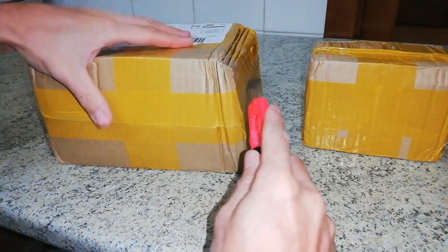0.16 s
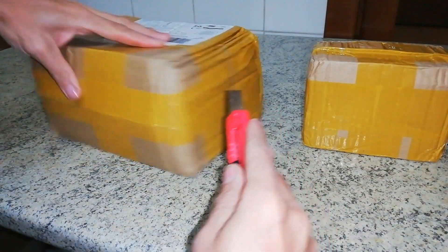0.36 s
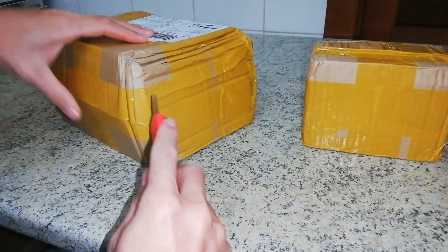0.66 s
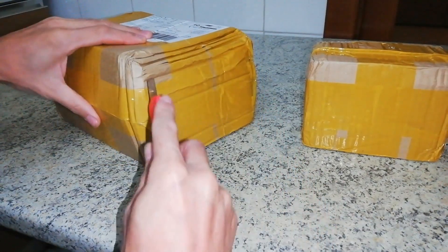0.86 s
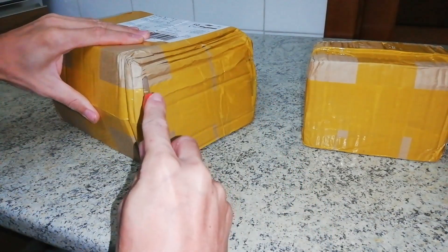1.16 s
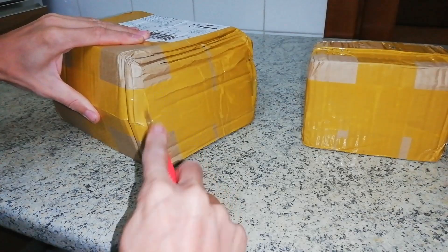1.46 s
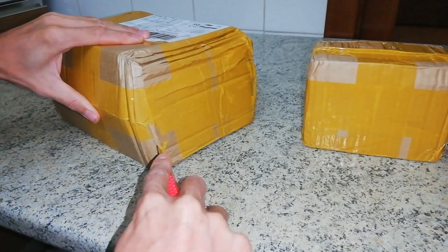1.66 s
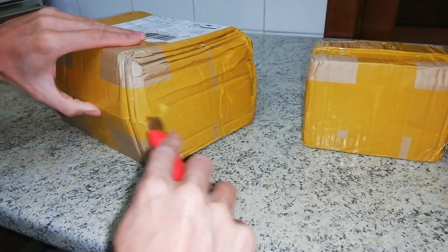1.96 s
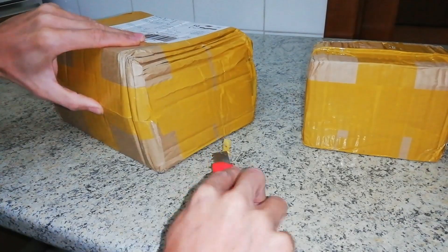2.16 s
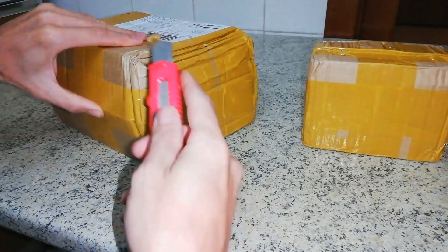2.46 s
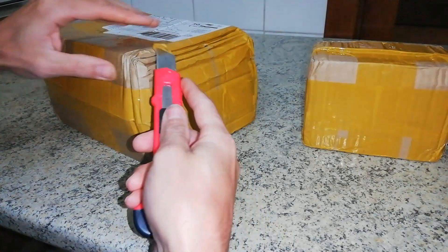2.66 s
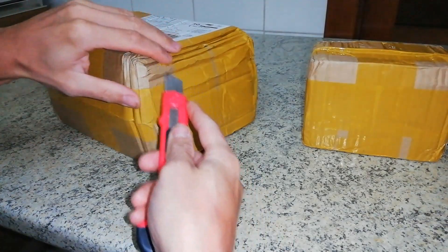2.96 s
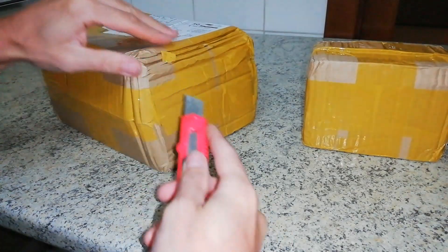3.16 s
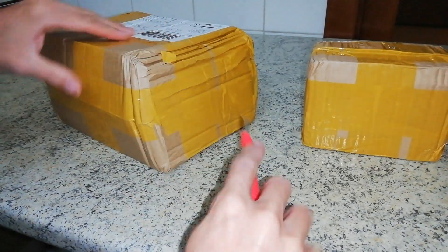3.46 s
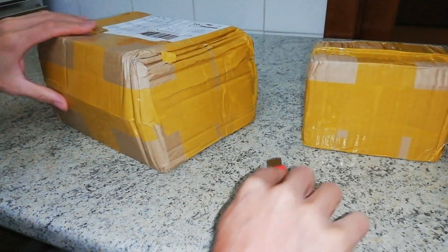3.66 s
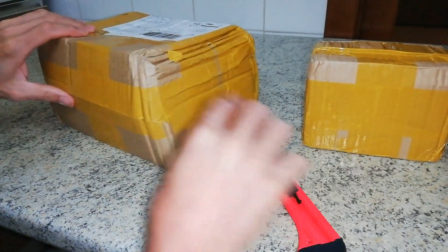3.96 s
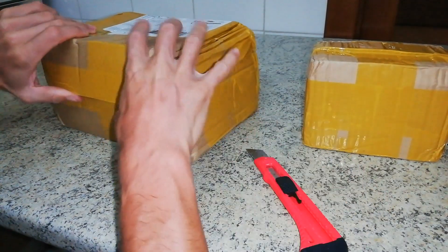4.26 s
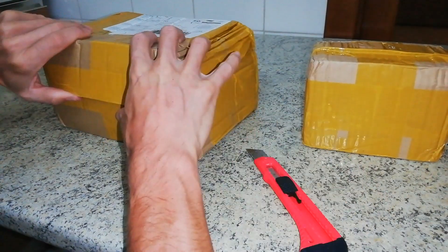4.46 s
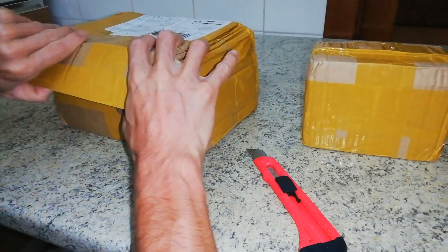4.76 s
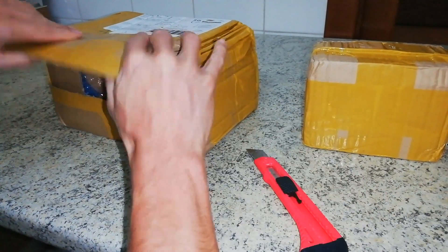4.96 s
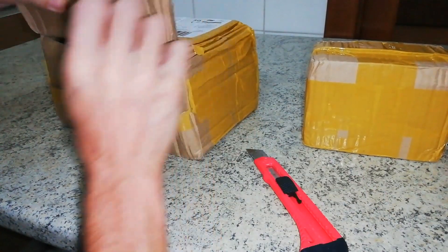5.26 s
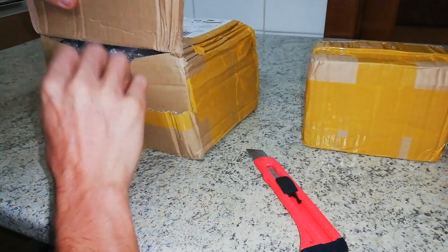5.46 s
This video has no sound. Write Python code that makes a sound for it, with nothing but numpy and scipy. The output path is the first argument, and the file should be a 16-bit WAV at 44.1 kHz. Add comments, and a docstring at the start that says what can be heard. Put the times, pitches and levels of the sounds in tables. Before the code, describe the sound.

A box cutter clacks, rasps through tape on a cardboard parcel, clatters onto a stone counter, then tape snaps and cardboard cracks open in a kitchen.

```python
"""A fridge hums in a tiled kitchen, then a cutter's blade clacks out: bursts of noise and ringing steel.
A taped cardboard box knocks, booms and hisses round on a stone counter; bright bursts snap and tick.
The blade rasps through the tape in swelling spurts of stick-slip noise, and strained tape crinkles in grains.
The cutter clatters down on the stone; then tape snaps and cardboard cracks as the flap is pulled open.
Tiles and stone answer with a diffuse ring of decaying noise."""
import sys
import numpy as np
from scipy import signal
from scipy.fft import rfft, irfft
from scipy.io import wavfile

SR = 44100
rng = np.random.default_rng(int(sys.argv[2]) if len(sys.argv) > 2 else 0)


def to_wav(sig):
    """Store sig (one row per channel, or 1-D mono) as 16-bit WAV at the path in sys.argv[1].

    Samples outside -1..1 are clipped; the rate is SR.
    """
    pcm = np.clip(np.atleast_2d(sig), -1, 1) * 32767
    pcm = np.round(pcm).astype(np.int16)
    wavfile.write(sys.argv[1], SR, pcm.T)  # frames by channels


N = 248046  # length in samples

# Table levels are drives: trims, filters and the room act on them afterwards.


def from_db(db):
    """Decibels to gain."""
    return 10 ** (np.asarray(db) / 20)


def rms_one(x):
    """Scale to unit rms."""
    return x / np.sqrt(np.mean(x ** 2) + 1e-20)


def at_hz(points, hz):
    """Read a table on a log-frequency axis."""
    points = np.array(points)
    return np.interp(np.log(np.maximum(hz, 1)), np.log(points[:, 0]), points[:, 1])


def gains(rows):
    """Each dB column of a curve as a gain in time, silent outside its span."""
    s, *columns = np.transpose(rows)
    t = np.arange(N) / SR
    return [from_db(np.interp(t, s, column, left=-np.inf, right=-np.inf)) for column in columns]


def strokes(rows):
    """Gain of rubbing strokes that gather speed, hold it and slow to a stop."""
    t = np.arange(N) / SR
    return sum(from_db(db) * np.interp(t, start + np.cumsum([0, attack, hold, release]), [0, 1, 1, 0])
               for start, attack, hold, release, db in rows)


def colour(x, spectrum, size=4096):
    """Causal (minimum-phase) filter that keeps the power of white noise."""
    shape = rms_one(from_db(at_hz(spectrum, np.linspace(0, SR / 2, size // 2 + 1))))
    # folding the cepstrum onto positive time gives the minimum phase
    cepstrum = irfft(np.log(shape))
    cepstrum[1:size // 2] *= 2
    cepstrum[size // 2 + 1:] = 0
    response = irfft(np.exp(rfft(cepstrum)))
    return signal.fftconvolve(x, response[None], axes=1)[:, :N]


def band(x, low_hz, high_hz):
    """Band-pass."""
    return signal.sosfilt(signal.butter(2, [low_hz, high_hz], "band", fs=SR, output="sos"), x)


def high_pass(x, cutoff_hz, order=2):
    """Take away the bass."""
    return signal.sosfilt(signal.butter(order, cutoff_hz, "high", fs=SR, output="sos"), x)


def ring(clicks, modes):
    """Clicks set damped resonances ringing."""
    out = 0
    for hz, db, t60 in modes:
        r = np.exp(-np.log(1000) / (t60 * SR))
        w = 2 * np.pi * hz / SR
        mode = signal.lfilter([0, np.sin(w)], [1, -2 * r * np.cos(w), r * r], clicks + 1e-18)
        out = out + from_db(db) * mode
    # a small body radiates little below its lowest mode, which is listed first
    return high_pass(out, modes[0][0] * 2 / 3)


def clicks_at(times, levels_db):
    """One impulse for each blow."""
    out = np.zeros(N)
    out[(np.asarray(times) * SR).astype(int)] = from_db(levels_db)
    return out


def stereo_noise(alike):
    """White noise partly shared by the two microphones; alike is the shared part of the power, 0-1."""
    return np.sqrt(alike) * rng.standard_normal(N) + np.sqrt(1 - alike) * rng.standard_normal((2, N))


def pan_gains(db, pan):
    """Left and right gain around a level; pan is left minus right in dB."""
    return from_db([[db + pan / 2], [db - pan / 2]])


def bursts(times, levels_db, pans_db, t60, rise_s):
    """Stereo envelope of fractures that build up within a moment and die quickly."""
    power, t = np.zeros((2, N)), np.arange(SR // 10) / SR
    shape = np.minimum(t / rise_s, 1) * np.exp(-np.log(1000) * np.maximum(t - rise_s, 0) / t60)
    for s, db, pan in zip(times, levels_db, pans_db):
        i = int(s * SR)
        power[:, i:i + len(t)] += (pan_gains(db, pan) * shape[:N - i]) ** 2
    return np.sqrt(power)


def grains(per_s, spread_db, grain_s, alike):
    """Fibres catching and letting go: tiny bursts of uneven size at random moments; rms 1."""
    sizes = from_db(spread_db * np.minimum(rng.exponential(1, N), 3))
    born = rng.random(N) < per_s / SR
    power = signal.lfilter([1], [1, -np.exp(-2 / (grain_s * SR))], born * sizes ** 2 + 1e-18)
    return rms_one(np.sqrt(power) * stereo_noise(alike))


def slips(per_s, uneven, spread_db, slip_s, rub):
    """Stick and slip: a ragged train of short tears over a little steady rubbing; rms 1."""
    gaps = np.exp(uneven * rng.standard_normal(N // 40)) / per_s  # the median gap is 1 / per_s
    times = np.cumsum(gaps)
    times = times[times < N / SR]
    tears = clicks_at(times, spread_db * rng.random(len(times)))
    power = signal.lfilter([1], [1, -np.exp(-2 / (slip_s * SR))], tears ** 2 + 1e-18)
    return rms_one(np.sqrt(power + rub * power.mean()) * stereo_noise(0.27))


# tint of the kitchen air: pitch_hz [Hz], level_db [dB per Hz]
AIR_COLOUR = [(20, -17.5), (50, -6), (70, -25), (100, -9), (150, -12.5), (290, -14.5), (400, -20.5),
              (600, -26.5), (1000, -25), (1500, -30), (10000, -34), (16000, -44)]
AIR_GAIN_DB = -61.5
# steady fridge lines: pitch_hz [Hz], level_db [dB rms]
FRIDGE_LINES = [(98, -65.5), (247.5, -71.5), (285, -70)]


def background():
    """Fridge lines over room noise, whose bass reaches both microphones alike."""
    t = np.arange(N) / SR
    hum = sum(from_db(db) * np.sqrt(2) * np.sin(2 * np.pi * (hz * t + rng.random())) for hz, db in FRIDGE_LINES)
    side = high_pass(rng.standard_normal(N), 500, order=1)
    air = colour(rng.standard_normal(N) + 0.99 * side * [[1], [-1]], AIR_COLOUR)
    return hum + from_db(AIR_GAIN_DB) * air


# plastic cutter clacking, in the hand and on the stone: start_s [s], level_db [dB],
# hollow handle_db [dB], ringing steel_db [dB], thin tick of the tip_db [dB], left_right_db [dB]
CLACKS = [(0.0719, -7.5, -26.5, -18, -25, 2), (0.0758, -21, -24.5, -30, -27, -12),
          (2.5126, -32.5, -47.5, -43, -54, -6), (2.5364, -25, -39.5, -35, -48, -1),
          (2.9043, -31.5, -48, -44, -55, 2), (3.4723, -16, -28, -31, -40, -8.5),
          (3.55, -27, -42.5, -35, -49, -7), (3.584, -1, -19.5, -4.5, -6, -2),
          (3.7890, -10.5, -24.5, -34, -8, -10), (3.795, -11.5, -26.5, -31, -15.5, -5)]
# handle skidding on the stone: start_s [s], attack_s [s], hold_s [s], release_s [s], level_db [dB]
HANDLE_SKIDS = [(3.544, 0.006, 0.006, 0.034, -31.5), (3.68, 0.072, 0.026, 0.0063, -39.5)]
# tints of shell, hollow handle and blade tip: pitch_hz [Hz], level_db [dB per Hz]
SHELL_COLOUR = [(700, -19), (1200, -6), (2300, -1), (2800, 0.5), (6300, 0.5), (10000, 0), (12000, -12.5),
                (16000, -25.5)]
HANDLE_COLOUR = [(380, -33.5), (800, -12), (1150, -5.5), (1550, -7), (2400, -15.5), (4000, -24)]
TIP_COLOUR = [(700, -23), (3500, -21), (7500, -15), (9700, -12.5), (16000, -35)]
# resonances of the steel: pitch_hz [Hz], level_db [dB], t60_s [s]
STEEL_MODES = [(2810, -12.5, 0.085), (6330, -9, 0.018), (9200, -23, 0.052)]


def cutter(shell_db, handle_db, ring_db, rattle_db, tick_db):
    """After each clack the loose blade and slider rattle on in the plastic handle; the steel rings briefly."""
    s, db, hollow_db, steel_db, tip_db, pan = np.transpose(CLACKS)
    clack = bursts(s, db + shell_db, pan, t60=0.02, rise_s=0.001) * stereo_noise(0.21)
    rattle = bursts(s, db + rattle_db, pan / 2, t60=0.082, rise_s=0.0022)
    rattle = rattle * slips(per_s=330, uneven=0.85, spread_db=15, slip_s=0.0011, rub=0.66)
    hollow = bursts(s, hollow_db + handle_db, pan / 2, t60=0.089, rise_s=0.0046) + strokes(HANDLE_SKIDS)
    hollow = hollow * stereo_noise(0.28)
    tick = bursts(s, tip_db + tick_db, pan, t60=0.017, rise_s=0.00061) * stereo_noise(0.49)
    steel = ring(clicks_at(s, steel_db + ring_db), STEEL_MODES)
    plastic = colour(clack + rattle, SHELL_COLOUR) + colour(hollow, HANDLE_COLOUR)
    return high_pass(plastic + colour(tick, TIP_COLOUR) + steel, 380)  # too small to radiate bass


# resonances of a knock: pitch_ratio [multiple of its pitch], level_db [dB], t60_s [s]
KNOCK_MODES = [(0.72, -3, 0.0039), (1, 1.5, 0.014), (1.299, -0.5, 0.0045)]


def knocks(times, levels_db, pitches_hz, pans_db, span):
    """Short hollow knocks, each within a factor span of the pitch of the patch that is struck or gives way."""
    out, blow = np.zeros((2, N)), signal.unit_impulse(SR // 10)
    for s, db, hz, pan in zip(times, levels_db, pitches_hz, pans_db):
        i = int(s * SR)
        tone = ring(blow, [(hz * ratio, mode_db, t60) for ratio, mode_db, t60 in KNOCK_MODES])
        tone = band(tone, hz / span, hz * span)
        out[:, i:i + len(tone)] += pan_gains(db, pan) * tone[:N - i]
    return out


# box, flap or cutter bumping down: start_s [s], box boom_db [dB], knock_db [dB], knock_hz [Hz]
BUMPS = [(0.194, -33, -38, 1290), (0.25, -33, -32.5, 288), (2.906, -55, -36, 1090), (3.4735, -74, -31, 764),
         (3.552, -64, -34.5, 440), (3.568, -65, -27, 1220), (4.8649, -31, -26, 288),
         (5.2945, -20, -32.5, 730), (5.3021, -32, -29.5, 1017)]
# a cardboard wall giving way: start_s [s] of its tape, tape_db [dB], wall_db [dB],
# thud_db [dB], thud_hz [Hz], knock_db [dB], knock_hz [Hz], left_right_db [dB]
WALL_CRACKS = [(1.34, -47, -36, -45, 400, -25, 1386, 0),
               (2.0008, -17.5, -41.5, -32, 300, -35.5, 1100, -1.5),
               (4.3214, -27, -43.5, -35, 785, -33, 1580, 13), (4.335, -20.5, -36, -32.5, 710, -27, 1200, 1),
               (4.4783, -15, -38, -20.5, 388, -23, 1180, 1), (4.681, -30, -34.5, -40, 336, -35, 810, 0),
               (4.6984, -12, -21, -15.5, 315, -21.5, 1140, 3), (4.734, -10, -21, -22, 333, -26, 1160, 6.5),
               (4.8533, -14, -22, -18.5, 272, -20, 1400, -1),
               (5.0343, -30, -38, -24.5, 725, -25.5, 1180, -2),
               (5.554, -29, -42, -32.5, 335, -34, 996, -0.5)]
# resonances of the air-filled box: pitch_hz [Hz], level_db [dB], t60_s [s]
BOX_MODES = [(130, -11, 0.033), (157.6, -2.5, 0.044), (188, -8.5, 0.16), (261, -10, 0.048)]
# the wall moves just after its tape; the boom of the box grows with it
WALL_LAG_S, BOOM_BELOW_WALL_DB = 0.00074, 8.5


def bumps(knock_db):
    """A blow or yielding wall gives a hollow knock and a boom in the air-filled box; a wall also thuds."""
    s, _, wall_db, low_db, low_hz, high_db, high_hz, pan = np.transpose(WALL_CRACKS)
    s = s + WALL_LAG_S
    thuds = knocks(s, low_db, low_hz, pan / 2, span=1.397)
    wall_knocks = knocks(s, high_db + knock_db, high_hz, pan, span=1.55)
    bump_s, box_db, bump_db, bump_hz = np.transpose(BUMPS)
    blows = knocks(bump_s, bump_db + knock_db, bump_hz, np.zeros(len(BUMPS)), span=1.49)
    pushes = clicks_at(bump_s, box_db) + clicks_at(s, wall_db - BOOM_BELOW_WALL_DB)
    boom = band(ring(pushes, BOX_MODES), low_hz=87, high_hz=267)
    return thuds + wall_knocks + blows + boom


# box swung round on the stone: start_s [s], attack_s [s], hold_s [s], release_s [s], level_db [dB]
BOX_SLIDES = [(0.23, 0.097, 0.12, 0.13, -38)]
# hand brushing over the hollow box: start_s [s], attack_s [s], hold_s [s], release_s [s], level_db [dB]
HAND_BRUSHES = [(0.965, 0.056, 0.018, 0.017, -38)]
# tints of cardboard on stone and of palm on box: pitch_hz [Hz], level_db [dB per Hz]
STONE_COLOUR = [(190, -41), (300, -8), (700, -12), (1550, -6), (2500, -10.5), (5200, -6.5), (6300, -7.5),
                (8200, -0.5), (11500, -8), (16000, -21)]
PALM_COLOUR = [(130, -36), (320, -4), (650, -2.5), (980, -7), (1800, -15), (3200, -27.5), (14000, -45)]


def sliding():
    """Cardboard hisses finely over polished stone; a hand brushes the box with a dull, hollow sound."""
    hiss = grains(per_s=2600, spread_db=0.5, grain_s=0.0002, alike=0.11)
    slide = colour(strokes(BOX_SLIDES) * hiss, STONE_COLOUR)
    brush = colour(strokes(HAND_BRUSHES) * stereo_noise(0.53), PALM_COLOUR)
    return slide + brush


# tape snaps and small ticks, a few from the cutter: start_s [s], level_db [dB], left_right_db [dB]
SNAPS_AND_TICKS = [(0.2502, -28.5, 5), (0.638, -37, 3), (1.0827, -28, -2.5), (1.3581, -44, -1),
                   (1.3873, -32, 1), (1.4189, -20, 2), (1.437, -18.5, 5), (1.4892, -23, -3),
                   (1.5538, -9, -1.5), (1.561, -16, 3), (1.566, -18.5, -6), (1.583, -28, -13),
                   (1.687, -25.5, -9), (1.7317, -25.5, -8.5), (1.808, -38, -2), (2.0702, -39.5, -16),
                   (2.104, -39.5, -6), (2.143, -41.5, -2), (2.455, -31.5, -8), (2.8191, -31, 0),
                   (2.8364, -36.5, -8), (2.8521, -30, 0), (2.9173, -38, -3), (2.9627, -27.5, -2),
                   (3.2154, -41.5, 0), (3.964, -34, 0), (4.1639, -21, 3.5), (4.188, -21, 1),
                   (4.2178, -17, 10), (4.2251, -12.5, 7), (4.23, -13, 2), (4.2423, -23, -7),
                   (4.3039, -21.5, 4), (4.313, -26, -4), (4.3645, -27.5, -2), (4.4545, -25.5, 6),
                   (4.5307, -24, 3), (4.5725, -19, 1.5), (4.604, -21, 2), (4.672, -23, 0),
                   (4.8655, -17.5, -4), (4.978, -27, -4), (5.0166, -23.5, 8), (5.126, -25.5, -2),
                   (5.1941, -32, -12), (5.2954, -26, -3)]
# tints of tape film and cardboard: pitch_hz [Hz], level_db [dB per Hz]
TAPE_COLOUR = [(880, -25.5), (1700, -12.5), (3000, -8.5), (5800, -9.5), (8200, 0.5), (10500, 0),
               (12300, -9.5), (16000, -20)]
BOARD_COLOUR = [(100, -37), (190, -11.5), (350, 0.5), (560, -2), (800, -2), (1350, 1), (2200, -3),
                (5000, -5), (7500, -21)]
PANEL_BELOW_SNAP_DB = 31.5  # a snap barely moves the panel under it; board_db then lifts all panels
# the inner liner of a wall cracks just after the outer one, more weakly
AFTERCRACK_S, AFTERCRACK_LOSS_DB = 0.00432, 9


def snaps(board_db):
    """Snaps and ticks are bright bursts over a cardboard crunch; a wall cracks twice, liner after liner."""
    light = [(s, db, db - PANEL_BELOW_SNAP_DB, pan) for s, db, pan in SNAPS_AND_TICKS]
    heavy = [(s, db, wall_db, pan) for s, db, wall_db, *_, pan in WALL_CRACKS]
    after = [(s + AFTERCRACK_S, db - AFTERCRACK_LOSS_DB, wall_db - AFTERCRACK_LOSS_DB, pan)
             for s, db, wall_db, pan in heavy]
    s, db, body_db, pan = np.transpose(light + heavy + after)
    crack = bursts(s, db, pan, t60=0.0085, rise_s=0.00066) * stereo_noise(0.22)
    board = bursts(s + WALL_LAG_S, body_db + board_db, pan, t60=0.031, rise_s=0.00087) * stereo_noise(0.77)
    return colour(crack, TAPE_COLOUR) + colour(board, BOARD_COLOUR)


# strain on the parcel while it is cut, points of a continuous curve: time_s [s], level_db [dB]
CUTTING_STRAIN = [(1.154, -57), (1.33, -44.5), (1.492, -34), (1.568, -47.5), (1.776, -63.5), (2.0, -67)]
# spurts of tape tearing: start_s [s], end_s [s], level_db at the end [dB]
TAPE_SPURTS = [(1.279, 1.291, -39), (1.339, 1.364, -36), (1.420, 1.465, -31), (1.492, 1.517, -22.5),
               (1.564, 1.595, -26.5), (1.661, 1.671, -28)]
# blade scraping over a corner: start_s [s], attack_s [s], hold_s [s], release_s [s], level_db [dB]
CORNER_SCRAPES = [(2.975, 0.019, 0.013, 0.016, -35)]
# tints of the cut and of the corner: pitch_hz [Hz], level_db [dB per Hz]
BLADE_COLOUR = [(140, -20), (220, -9), (380, -2), (520, -9), (1300, -1.5), (3500, -4), (6000, -2.5),
                (9000, 5.5), (12700, -5.5), (16000, -13)]
EDGE_COLOUR = [(450, -23), (1050, -4.5), (1800, -7.5), (2600, 1.5), (3600, -7.5), (4500, -4), (9500, 1.5),
               (12000, -8), (16000, -21)]
# edges of the low, middle and high band of the crackle: edge_hz [Hz]
JERK_BAND_EDGES_HZ = [50, 2500, 7000, 17000]


def blade(swell_db, boom_db):
    """The blade speeds up through the tape in stick-slip jerks, then catches and stops."""
    # each spurt swells to its end, then falls away within milliseconds
    level = sum(gains([(start, db - swell_db), (end, db), (end + 0.0037, db - 30)])[0]
                for start, end, db in TAPE_SPURTS)
    # low, middle and high bands get independent jerks, so the crackle varies in colour
    jerks = sum(band(slips(per_s=520, uneven=0.8, spread_db=4.0, slip_s=0.0012, rub=0.19), low, high)
                for low, high in zip(JERK_BAND_EDGES_HZ, JERK_BAND_EDGES_HZ[1:]))
    # the held box rumbles as long as the blade presses on it
    pressure = gains(CUTTING_STRAIN)[0] + level / 2
    rumble = ring(pressure * jerks.mean(axis=0), BOX_MODES[:2])
    scrape = strokes(CORNER_SCRAPES) * slips(per_s=520, uneven=0.4, spread_db=-8, slip_s=0.0012, rub=0.36)
    return colour(level * jerks, BLADE_COLOUR) + from_db(boom_db) * rumble + colour(scrape, EDGE_COLOUR)


# strain on the parcel while it is turned, then pulled open,
# points of continuous curves: time_s [s], level_db [dB]
TURNING_STRAIN = [(2.78, -73), (2.86, -51.5), (2.984, -51), (3.074, -84), (3.248, -61), (3.32, -117)]
OPENING_STRAIN = [(4.054, -52.5), (4.212, -55), (4.35, -37), (4.39, -66), (4.524, -45), (4.878, -36),
                  (4.972, -38.5), (5.076, -69), (5.252, -44)]
# tape dragging over tape: start_s [s], attack_s [s], hold_s [s], release_s [s], level_db [dB]
TAPE_SWISHES = [(3.185, 0.054, 0.012, 0.022, -51.5), (4.225, 0.012, 0.01, 0.028, -44),
                (4.58, 0.14, 0.028, 0.03, -39), (4.97, 0.059, 0.017, 0.087, -33.5),
                (5.288, 0.0048, 0.0087, 0.05, -42.5)]


def handling(cutting_db, turning_db, opening_db, ticks_db):
    """Strained tape crinkles and ticks, cardboard fibres creak; each job has its (tape dB, cardboard dB)."""
    strain = np.array([gains(job)[0] for job in (CUTTING_STRAIN, TURNING_STRAIN, OPENING_STRAIN)])
    tape, board = from_db([cutting_db, turning_db, opening_db]).T @ strain
    crinkle = grains(per_s=530, spread_db=5.5, grain_s=0.0047, alike=0.077)
    crinkle = (tape + strokes(TAPE_SWISHES)) * crinkle
    creak = board * grains(per_s=170, spread_db=3.0, grain_s=0.0011, alike=0.49)
    ticks = tape * grains(per_s=55, spread_db=2.0, grain_s=0.00098, alike=0.2)
    return colour(crinkle + from_db(ticks_db) * ticks, TAPE_COLOUR) + colour(creak, BOARD_COLOUR)


RIGHT_LAG_SAMPLES = 7


def sources():
    """One draw of parcel and cutter; the parcel lies nearer the left microphone, so the right lags."""
    parcel = snaps(board_db=6.5) + bumps(knock_db=3.0) + sliding()
    parcel = parcel + from_db(3.0) * blade(swell_db=6.5, boom_db=-30.5)
    parcel = parcel + handling(cutting_db=(-4, -2), turning_db=(-1.5, -5.5), opening_db=(-7, -5), ticks_db=-6.5)
    parcel = np.array([parcel[0], np.roll(parcel[1], RIGHT_LAG_SAMPLES)])
    return parcel + cutter(shell_db=-8.0, handle_db=-5.0, ring_db=-4.0, rattle_db=-15.5, tick_db=-3.0)


# decay of the room's ring: pitch_hz [Hz], t60_s [s]
ROOM_T60 = [(500, 0.4851), (3700, 0.52), (9000, 0.45)]
# strength of the room's ring: pitch_hz [Hz], level_db [dB]
ROOM_STRENGTH = [(170, -10.5), (330, 1), (1200, -1), (4000, -4), (9000, -5), (15000, -9)]


def kitchen(x, build_s):
    """The diffuse ring of tiles and stone at both microphones; it dies sooner in the top treble."""
    t = np.arange(SR * 3 // 4) / SR
    edges = np.geomspace(70, 17500, 17)
    white, response = rng.standard_normal((2, 2, len(t))), 0
    for k, (low, high) in enumerate(zip(edges, edges[1:])):
        hz = np.sqrt(low * high)
        mid, side = band(white[k % 2], low, high)
        apart = min(hz / 400, 1) ** 2 / 2  # long waves reach both microphones alike
        noise = np.sqrt(1 - apart) * mid + np.sqrt(apart) * side * [[1], [-1]]
        decay = np.exp(-np.log(1000) * t / at_hz(ROOM_T60, hz))
        envelope = rms_one(np.minimum(t / build_s, 1) * decay)
        response = response + noise * from_db(at_hz(ROOM_STRENGTH, hz)) * envelope
    return signal.fftconvolve(x[None], response / np.sqrt(len(t)), axes=1)[:, :N]


# the band that the counter's reflection weakens: centre, sharpness, depth 0-1
COUNTER_DIP_HZ, COUNTER_DIP_Q, COUNTER_DIP_SHARE = 526, 2.63, 0.34


def counter(x):
    """The reflection from the stone partly cancels a band in the low middle."""
    dip = signal.lfilter(*signal.iirpeak(COUNTER_DIP_HZ, COUNTER_DIP_Q, fs=SR), x)
    return x - COUNTER_DIP_SHARE * dip


def scene():
    """Several independent draws feed the room, which keeps its ring smooth and diffuse."""
    direct, room_only = sources(), sources()
    feeds = [*direct, *room_only]
    room = sum(kitchen(feed, build_s=0.0023) for feed in feeds) / np.sqrt(len(feeds))
    return counter(direct + room) + background()


CUTOFF_HZ = 16200


def record(dry):
    """The loudest peaks are rounded and the top is cut."""
    rounded = np.tanh(dry)
    return signal.sosfilt(signal.ellip(10, .1, 80, CUTOFF_HZ, fs=SR, output="sos"), rounded)


dry = scene()
out = record(dry)
to_wav(out)
```